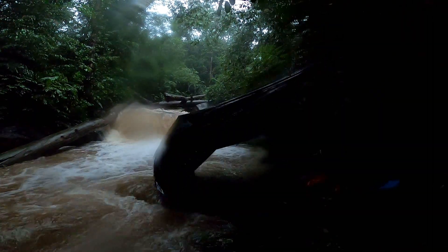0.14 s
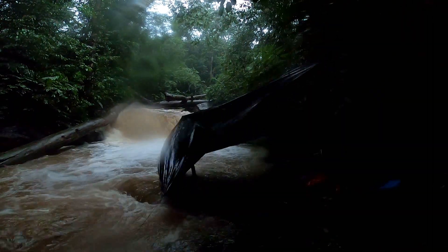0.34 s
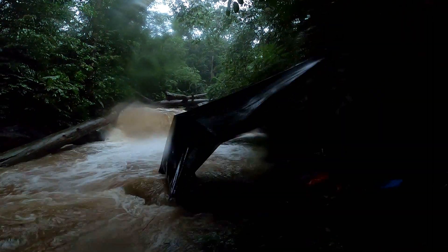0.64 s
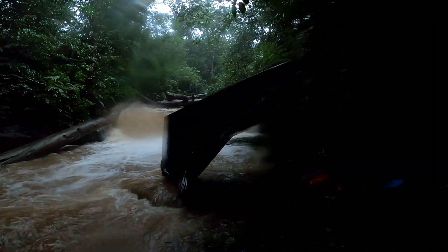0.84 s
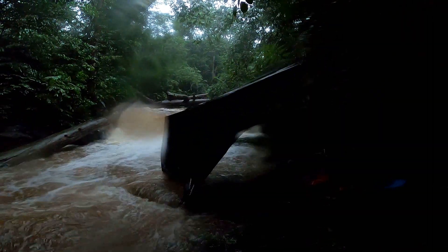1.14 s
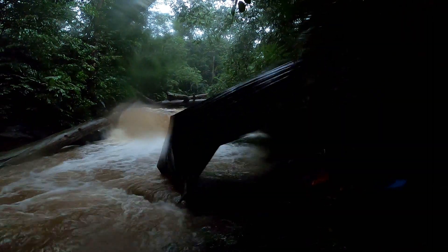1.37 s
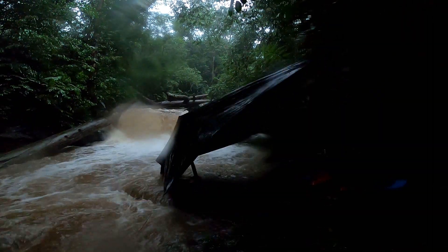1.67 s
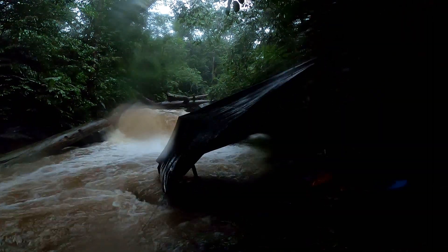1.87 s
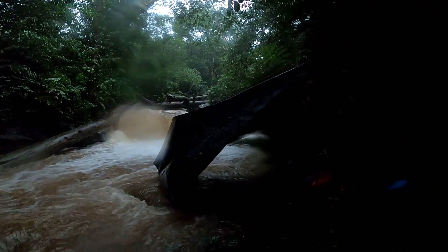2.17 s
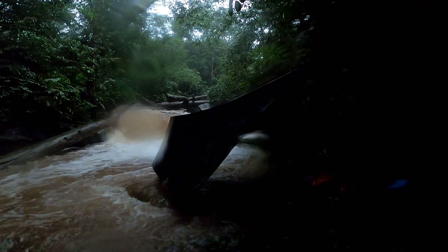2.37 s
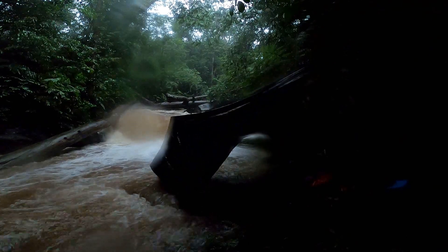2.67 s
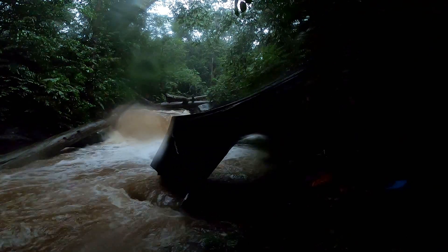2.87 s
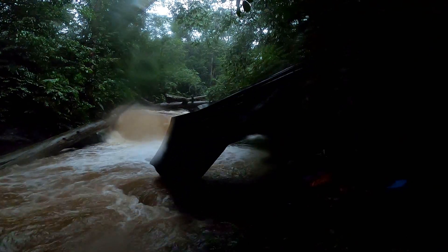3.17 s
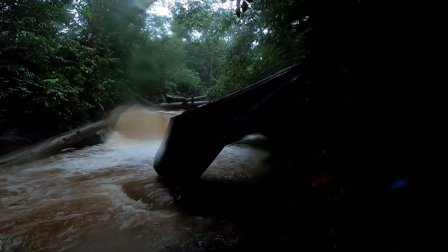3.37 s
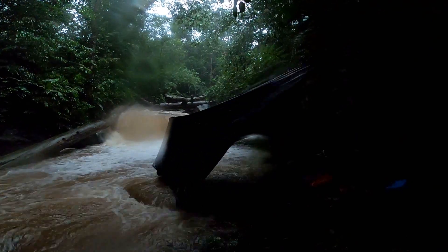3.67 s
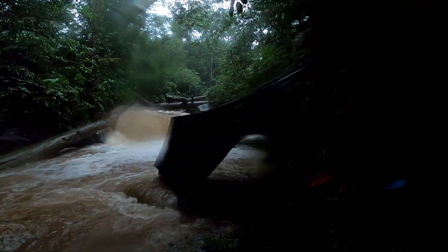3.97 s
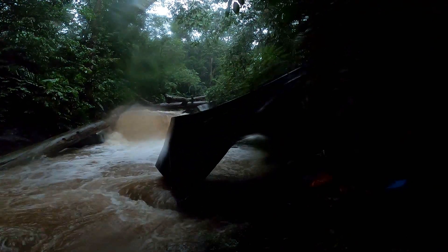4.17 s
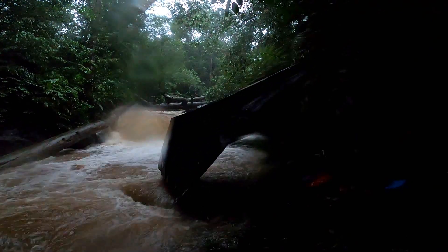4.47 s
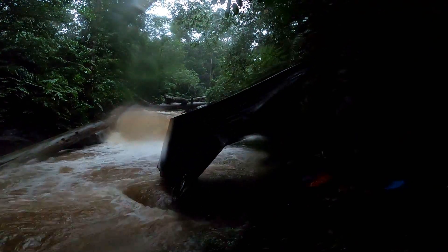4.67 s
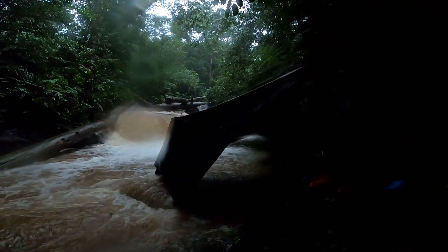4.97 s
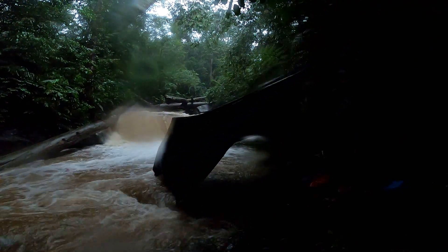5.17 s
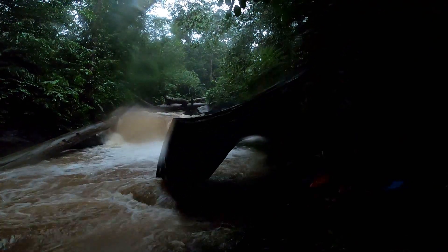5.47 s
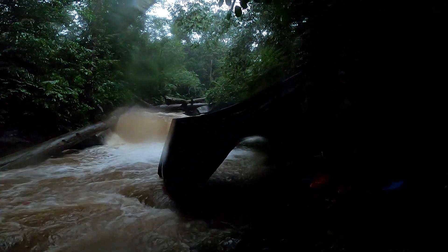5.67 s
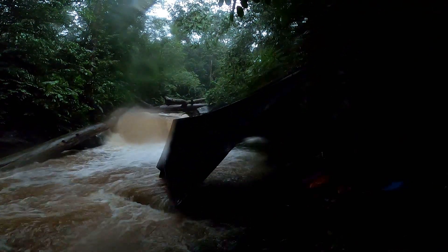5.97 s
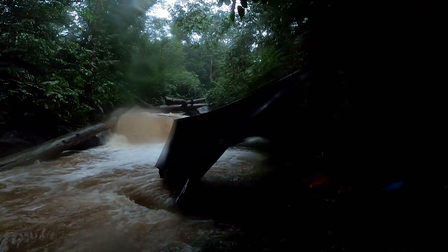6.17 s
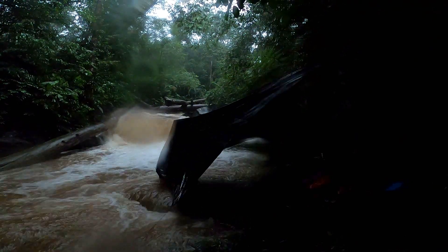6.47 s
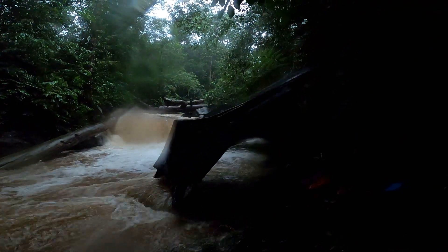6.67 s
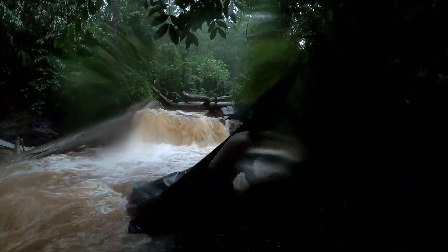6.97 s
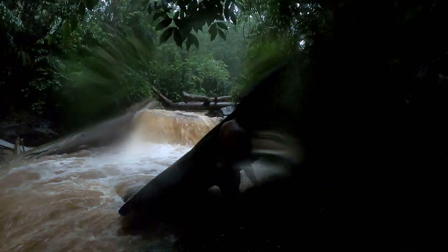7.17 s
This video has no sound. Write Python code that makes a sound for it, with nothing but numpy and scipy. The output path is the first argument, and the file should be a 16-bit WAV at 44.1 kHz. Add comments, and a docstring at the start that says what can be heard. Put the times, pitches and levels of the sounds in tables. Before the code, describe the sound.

A flooded rainforest stream pours over a low waterfall in a loud, unbroken roar. Deep rumble and a hollow throbbing boom come from the plunge pool, heaving irregularly as heavy slugs of water land. Bubbles fizz, gurgle and patter in the white water, with small sprays nearby. A close microphone in a wet housing makes it centred and slightly muffled. It stops abruptly just before the end.

```python
"""First and throughout, a flooded forest stream booms and roars as it pours over a low waterfall.
Air driven under water throbs in the plunge pool; heavy slugs of water make it heave and splash.
White water is filtered noise, and its bubbles are thousands of short rings; crests break in short sprays.
A microphone in a spray-wet housing hears it; the resonance of its wet port sinks slowly.
The sound cuts off shortly before the end."""
import sys
import numpy as np
from scipy import signal
from scipy.fft import rfft, irfft, next_fast_len
from scipy.io import wavfile
from scipy.ndimage import uniform_filter1d, map_coordinates

SR = 44100
rng = np.random.default_rng(int(sys.argv[2]) if len(sys.argv) > 2 else 0)


def wav_record(signal):
    """Record a signal, one row per channel, as 16-bit PCM in the file named by sys.argv[1]."""
    frames = np.transpose(np.atleast_2d(signal))
    bounded = np.clip(frames, -1, 1)
    # unit amplitude maps onto the largest positive 16-bit level
    quanta = np.round(bounded * 32767).astype(np.int16)
    wavfile.write(sys.argv[1], SR, quanta)


N = 323673
TIME = np.arange(N) / SR  # seconds

# Tone of the crests that break close by. Columns: frequency_hz, level_db_per_hz
BREAK_SPRAY_SPECTRUM = [(150, -18.5), (500, 1.5), (1500, 3.5), (3000, 0.5), (6000, -11), (14000, -19.5)]
# The clear crests that break close by. Columns: crest_s, level_db
CLEAR_BREAKS = [(1.51, -28), (2.08, -29), (6.39, -28)]
# Tone of the rushing white water. Columns: frequency_hz, level_db_per_hz
RUSH_SPECTRUM = [(60, -17), (200, -27.5), (330, -1), (520, -3), (850, -3), (1300, -5.5), (2100, -6),
                 (2700, -8.5), (3300, -7.5), (7000, -10), (10000, -14.5), (15000, -22.5)]
# Tone of water slapping back on the pool. Columns: frequency_hz, level_db_per_hz
SPLASH_SPECTRUM = [(100, -29.5), (320, -0.5), (520, -0.4), (850, -4.5), (1400, -13), (3000, -34.5)]
# Tone of the air clouds throbbing in the plunge pool. Columns: frequency_hz, level_db_per_hz
BOOM_SPECTRUM = [(20, -56), (80, -17.5), (118, -6.5), (146, 0), (200, 0), (246, -1.5), (275, -6),
                 (370, -10), (520, -29.5), (1500, -57.5)]
# Tone of the weight of the falling water. Columns: frequency_hz, level_db_per_hz
RUMBLE_SPECTRUM = [(3, -32.5), (16, -14), (26, -4.5), (36, -3), (50, -1.5), (70, -1), (92, -4), (130, -8.5),
                   (400, -47.5)]
# Heavy slugs of water that land in the plunge pool.
# Columns: crest_s, strength_db, trapped_air_pitch_hz, rumble_change_db, splash_change_db
SLUGS_OF_WATER = [(.43, 2, 188, 0, -0.5), (.59, 2.4, 216, 1, 0), (0.821, -0.6, 200, 0.5, -2),
                  (0.931, -2, 165, 7.5, -0.5), (1.04, 2.5, 211, 0, 1), (1.13, 2.2, 240, -1.5, 3),
                  (1.21, 5.5, 202, -1, -2), (1.47, 2.5, 192, 0.5, 0), (1.60, 0.5, 203, 5, 0.5),
                  (2.18, 2, 201, 0.5, 4.5), (3.24, 3, 200, -3, -0.5), (3.64, -2.5, 179, 7, 2),
                  (3.82, -4, 179, 2.5, 0.5), (4.67, 2.4, 191, 2, -0.5), (4.771, 3, 203, -2.5, -2),
                  (4.901, -5, 200, 4.5, -3), (5.29, -2, 200, 5, -3.5), (5.711, 4, 190, -5, 1.5),
                  (5.909, 4, 223, 2, 2.5), (6.039, 2, 188, -0.5, -1), (6.23, 1.7, 203, 1, 0.5),
                  (6.42, 3.3, 208, -1, 3), (6.721, 5, 204, -3, -3)]
# Moments between slugs when boom and rumble change level, the boom mostly dipping.
# Columns: middle_s, boom_change_db, rumble_change_db
LEVEL_CHANGES = [(.35, -6.5, 6), (2.46, 0, 1.5), (2.75, -2.5, 0.5), (3.14, -3, 3), (3.44, -3, 1),
                 (3.89, -3, -0.5), (4.08, 0.5, -3.5), (5.13, -3, -2), (5.82, -4.5, 4), (6.16, -3.5, 3),
                 (6.52, -9, 6)]
# What the housing lets through. Columns: frequency_hz, gain_db
HOUSING_RESPONSE = [(3480, 0.54), (3740, 3), (3910, 2), (4050, -3.5), (4210, -10), (4400, -12.5),
                    (4900, -12), (5600, -12.5), (7000, -12.5), (12000, -15), (14000, -17.5), (15200, -17)]

FOAM_DB, WIDTH_DB = -22.5, -30.5  # the left-right noise is relative to the foam
SPLASH_DB, RUMBLE_DB = -31.5, -26.5  # before slugs and level changes act on them
BOOM_DB, BOOM_EASE_DB_PER_S = -22, 0.08  # the boom starts here and eases slowly
BOOM_SWELL_SHARE = 0.3  # how much of a slug's strength also lifts the churning boom
SLUG_RISE_S, SLUG_FALL_S, CHANGE_S = 0.045, 0.089, 0.045  # a level change comes and goes alike
CLOUD_DB, CLOUD_GROWTH = -26, 1.75  # throb at strength 0, and dB added per dB of strength
CLOUD_WAVER = 0.0842  # size of the pitch drift, as a share of the pitch
CLOUD_RISE_S, CLOUD_FALL_S = 0.04, 0.055
PORT_HZ, PORT_SAG_HZ_PER_S = 5840, 68.4  # starting resonance, and how fast it sinks
PORT_DAMPING_HZ_PER_S = 14  # the resonance widens as water gathers
STOP_S, TOP_HZ = 6.855, 15100  # end of the sound, and upper frequency limit


def amp(db):
    """Turn decibels into gain."""
    return 10 ** (np.asarray(db) / 20)


def unit(x):
    """Scale x to an average strength (rms) of 1."""
    return x / np.sqrt(np.mean(x ** 2) + 1e-20)


def along(points, hz):
    """Join (frequency, value) points by straight lines on a log frequency axis."""
    point_hz, value = np.transpose(points)
    return np.interp(np.log(hz + 1), np.log(point_hz + 1), value)


def wobble(rate):
    """Draw a smooth random curve with rate random points a second."""
    knots = rng.standard_normal(int(N * rate / SR) + 4)
    return map_coordinates(knots, [TIME * rate])


def swell(age, rise_s, fall_s):
    """Make a rounded rise and fall with its crest at age 0."""
    return np.exp(-(age / np.where(age < 0, rise_s, fall_s)) ** 2)


def filtered(x, response):
    """Change the strength of each frequency in x by the given response."""
    size = next_fast_len(N + SR // 2)  # spare room keeps the end from wrapping to the start
    hz = np.fft.rfftfreq(size, 1 / SR)
    return irfft(rfft(x, size) * response(hz), size)[:N]


def turbulence(spectrum, patchy_db):
    """Churning water as noise of rms 1, whose bands swell and sink in short random patches."""
    z = signal.stft(rng.standard_normal(N), nperseg=512)[2]
    patches = uniform_filter1d(rng.standard_normal(z.shape), size=9, axis=0)  # blur over frequency
    patches = uniform_filter1d(patches, size=22, axis=1)  # blur over time
    noise = signal.istft(z * amp(patchy_db * unit(patches)), nperseg=512)[1][:N]
    return unit(filtered(noise, lambda hz: amp(along(spectrum, hz))))


def even_flow(x, span_s):
    """Even out the strength of x over about span_s: a constant flow churns but does not swell."""
    window = signal.windows.hann(int(span_s * SR) + 3)
    power = signal.fftconvolve(x ** 2, window, "same")
    return unit(x / np.sqrt(np.abs(power) + 1e-9))


def bubbles(count, centre_hz, spread, cycles, scatter_db, rise):
    """Bubbles at rms 1: each loses 60 dB over some cycles, its pitch rising as it nears the surface."""
    t = np.arange(SR // 40) / SR  # each ring is cut at 25 ms
    start = rng.integers(0, N, (count, 1))
    hz = centre_hz * np.exp(spread * rng.standard_normal((count, 1)))
    hz = np.clip(hz, 350, 9000)
    size = amp(scatter_db * np.minimum(rng.exponential(size=(count, 1)), 4))
    age = hz * t / cycles
    turns = hz * t * (1 + rise * np.minimum(age, 1) / 2)
    ring = size * amp(-60 * age) * np.sin(2 * np.pi * turns)
    places = start + np.arange(len(t))
    cloud = np.bincount(places.ravel(), ring.ravel(), minlength=N)[:N]
    # a gentle high-pass at 200 Hz removes the constant offset of the short rings
    return unit(filtered(cloud, lambda f: 1j * f / (1j * f + 200)))


def level_swells():
    """Find the dB that slugs and level changes add to the boom and rumble, and slugs to the splash."""
    crest_s, strength_db, _, rumble_db, splash_db = np.transpose(SLUGS_OF_WATER)
    middle_s, boom_change_db, rumble_change_db = np.transpose(LEVEL_CHANGES)
    slug = swell(TIME - crest_s[:, None], SLUG_RISE_S, SLUG_FALL_S)
    change = swell(TIME - middle_s[:, None], CHANGE_S, CHANGE_S)
    boom_swell_db = BOOM_SWELL_SHARE * strength_db @ slug + boom_change_db @ change
    rumble_swell_db = rumble_db @ slug + rumble_change_db @ change
    return boom_swell_db, rumble_swell_db, splash_db @ slug


def breaking_waves(count, size_db, scatter_db, rise_s, fall_s):
    """Crests break near the bank in short sprays: a few clear ones among many small ones."""
    small = [(when * STOP_S, size_db + scatter_db * size) for when, size in rng.random((count, 2))]
    power = np.zeros(N)
    for crest_s, level_db in CLEAR_BREAKS + small:
        crest = int(crest_s * SR)
        near = slice(max(0, crest - SR // 10), crest + SR // 5)
        power[near] += (amp(level_db) * swell(TIME[near] - crest_s, rise_s, fall_s)) ** 2
    return np.sqrt(power) * turbulence(BREAK_SPRAY_SPECTRUM, patchy_db=2.5)


def white_water():
    """Distant foam merges into a rush; nearer bubbles fizz on top of it and drops of spray patter."""
    surge_db = 0.12 * wobble(2.7) + 0.037 * wobble(25)
    rush = turbulence(RUSH_SPECTRUM, patchy_db=0.5)
    fizz = bubbles(count=8000, centre_hz=3120, spread=0.4, cycles=14.0, scatter_db=1.5, rise=0.102)
    # the patter uses the same ringing sound, but dies out in fewer cycles
    spray = bubbles(count=5000, centre_hz=2180, spread=0.57, cycles=3.4, scatter_db=2, rise=0.1)
    return amp(FOAM_DB + surge_db) * (rush + amp(-14.0) * fizz + amp(-21.5) * spray)


def splash(swell_db):
    """Water slaps back on the pool and large bubbles gurgle in it; slugs change the level."""
    slap = turbulence(SPLASH_SPECTRUM, patchy_db=2.0)
    gurgle = bubbles(count=2400, centre_hz=699, spread=0.42, cycles=25, scatter_db=2.5, rise=0.21)
    return amp(SPLASH_DB + swell_db) * (slap + amp(-4.5) * gurgle)


def air_clouds():
    """Each slug traps one big cloud of air, which throbs briefly at its own unsteady pitch."""
    throb = np.zeros(N)
    for crest_s, strength_db, pitch_hz, _, _ in SLUGS_OF_WATER:
        near = np.abs(TIME - crest_s) < 0.3
        age = TIME[near] - crest_s
        drift = map_coordinates(rng.standard_normal(32), [(age - age[0]) * 40])  # 40 points a second
        turns = np.cumsum(pitch_hz * (1 + CLOUD_WAVER * drift)) / SR + rng.random()
        level = amp(CLOUD_DB + CLOUD_GROWTH * strength_db) * swell(age, CLOUD_RISE_S, CLOUD_FALL_S)
        throb[near] += level * np.sin(2 * np.pi * turns)
    return throb


def plunge_pool(boom_swell_db, rumble_swell_db):
    """The falling sheet drives air under water, where it throbs over a deep rumble; both heave."""
    boom_db = BOOM_DB - BOOM_EASE_DB_PER_S * TIME + boom_swell_db
    boom = even_flow(turbulence(BOOM_SPECTRUM, patchy_db=0.15), span_s=0.18)
    rumble = even_flow(turbulence(RUMBLE_SPECTRUM, patchy_db=-1.9), span_s=0.26)
    return amp(boom_db) * boom + amp(RUMBLE_DB + rumble_swell_db) * rumble


def scene():
    """All the water sits in the centre; a very faint patchy noise is added, opposite in left and right."""
    boom_swell_db, rumble_swell_db, splash_swell_db = level_swells()
    breaks = breaking_waves(count=70, size_db=-37, scatter_db=3.5, rise_s=0.007, fall_s=0.022)
    fall = splash(splash_swell_db) + air_clouds() + plunge_pool(boom_swell_db, rumble_swell_db)
    water = breaks + white_water() + fall
    # the faint noise borrows the tone of the rush
    side_noise = amp(FOAM_DB + WIDTH_DB) * turbulence(RUSH_SPECTRUM, patchy_db=10.0)
    return np.array([water + side_noise, water - side_noise])


def wet_port(x, width_hz):
    """Water in the port acts as a mass on a spring: it rings at its resonance and dulls what lies above."""
    hz, time_s, z = signal.stft(x, SR, nperseg=1024)
    f = hz[:, None]
    centre = PORT_HZ - PORT_SAG_HZ_PER_S * time_s
    width = width_hz + PORT_DAMPING_HZ_PER_S * time_s
    response = centre ** 2 / (centre ** 2 - f ** 2 + 1j * f * width)
    return signal.istft(z * response, SR, nperseg=1024)[1][:, :N]


def record(dry):
    """The wet port and the housing colour the sound, which stops abruptly; the top is cut off."""
    running = np.clip((STOP_S - TIME) / 0.002, 0, 1)  # a 2 ms fade
    ported = wet_port(dry, width_hz=458)
    heard = [filtered(side, lambda hz: amp(along(HOUSING_RESPONSE, hz))) for side in ported]
    return np.array([filtered(side * running, lambda hz: hz < TOP_HZ) for side in heard])


dry = scene()
out = record(dry)
wav_record(out)
```